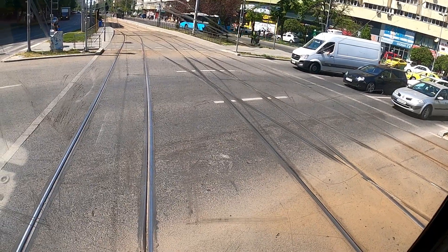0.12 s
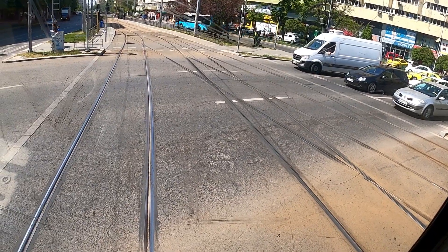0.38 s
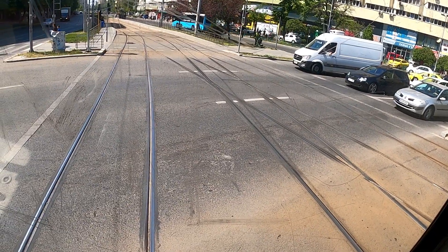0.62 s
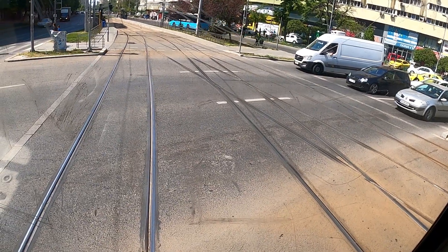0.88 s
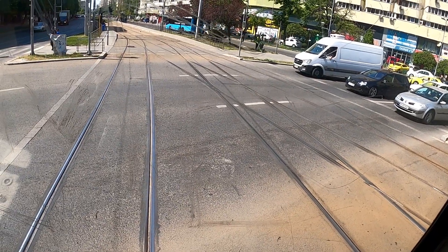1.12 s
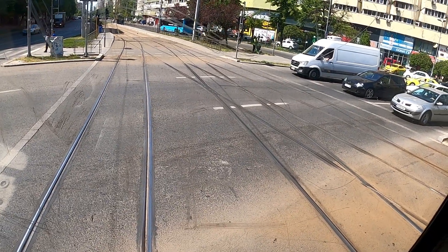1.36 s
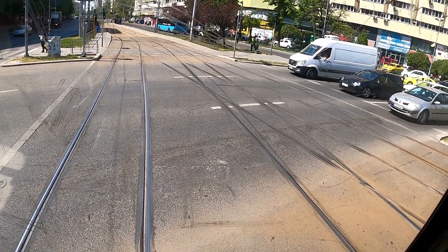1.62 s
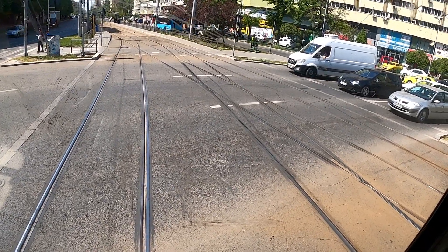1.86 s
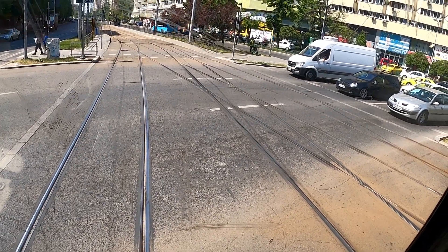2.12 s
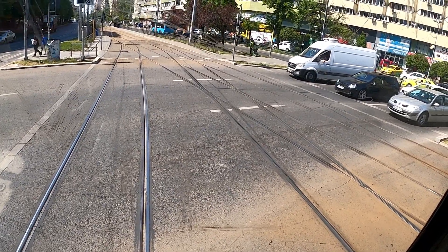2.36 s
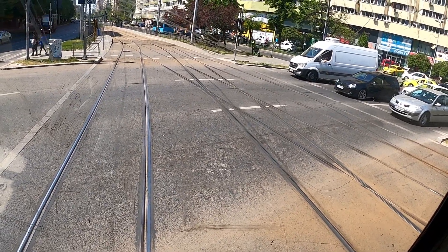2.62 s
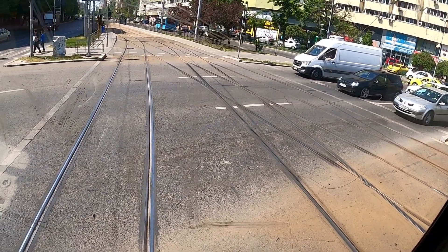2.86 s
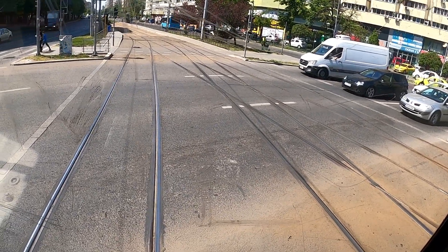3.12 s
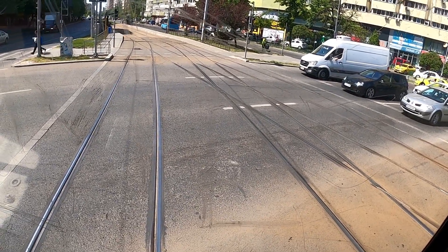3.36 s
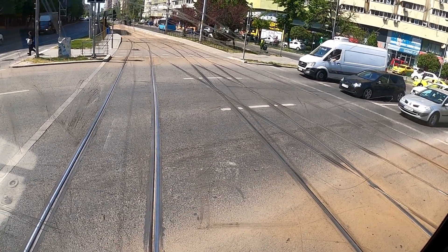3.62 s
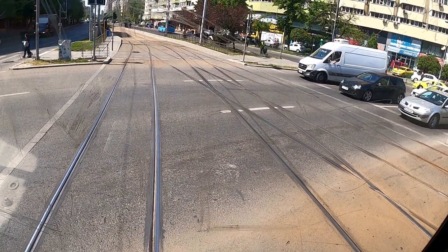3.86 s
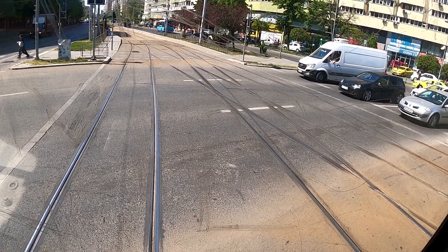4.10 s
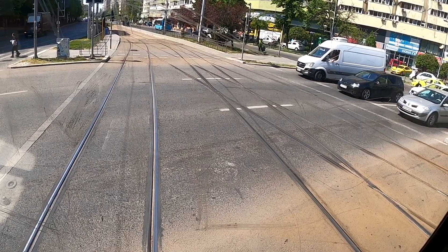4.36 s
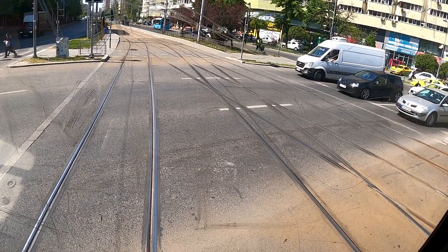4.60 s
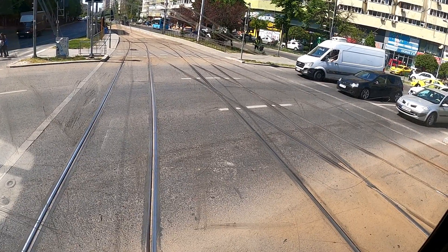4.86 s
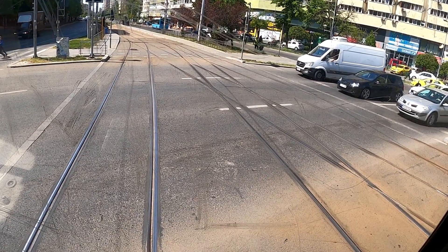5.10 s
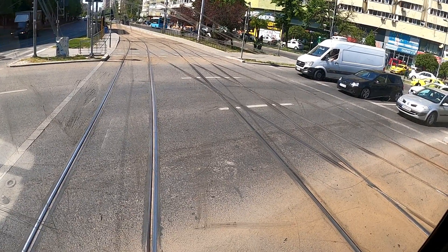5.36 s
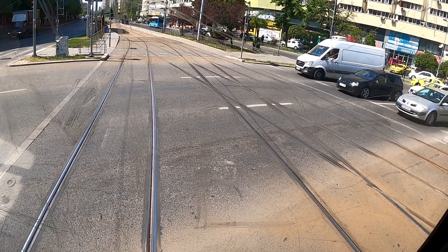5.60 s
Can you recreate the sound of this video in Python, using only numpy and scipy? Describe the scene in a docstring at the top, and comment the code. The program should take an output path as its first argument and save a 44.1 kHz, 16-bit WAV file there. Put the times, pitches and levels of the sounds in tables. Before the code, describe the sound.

Heard from a small stereo camera inside a stationary vehicle cab: deep throbbing idle and body rumble throughout, with dull street noise outside. An indicator relay tocks and ticks evenly in front, with short cabin echoes. Soft grainy hiss swells now and then, tiny dry rattles cluster around three seconds, and brief squeaks ride on hiss near the end. Two engines pull away quietly, one at the start, one from two seconds.

```python
"""Inside the cab of a tram that waits at a city crossing, heard through a small stereo camera.
From the start an idling engine, low drones and a first car pulling away sound over rumble and roar (noise).
The indicator relay (struck modes and noise) tocks open at 0.1 s, ticks shut at 0.6 s and so on, twice a second;
hiss (noise) swells now and then. A second car pulls away from 2 s; loose trim (dying sines) rattles lightly,
most densely near 3 s. Faint squeaks (narrow noise) come on swells of hiss from 4.5 s."""
import sys
import numpy as np
from scipy import signal
from scipy.fft import rfft, irfft, next_fast_len
from scipy.io import wavfile
from scipy.ndimage import uniform_filter1d, minimum_filter1d, map_coordinates

SR = 44100
rng = np.random.default_rng(int(sys.argv[2]) if len(sys.argv) > 2 else 0)


def boost_factor(decibels):
    """Convert a level in decibels to a linear amplitude factor."""
    exponent = np.asarray(decibels, float) / 20
    return 10 ** exponent


def digitize_waveform(pressure):
    """Quantize a signal to 16-bit integers and store it at the path in sys.argv[1].

    Rows of a 2-D input are taken as channels; values are limited to [-1, 1].
    """
    field = np.atleast_2d(pressure).T
    bounded = np.clip(field, -1, 1)
    quanta = np.round(bounded * 32767).astype(np.int16)
    wavfile.write(sys.argv[1], SR, quanta)


N = 252693


def unit(x):
    """Scale to rms 1."""
    return x / np.sqrt(np.mean(x ** 2) + 1e-20)


def along(points, hz):
    """Read (f/Hz, value) points on a log frequency axis."""
    f, v = np.transpose(points)
    return np.interp(np.log(hz + 1), np.log(f + 1), v)


def curves(rows):
    """One value per sample for each column after the time."""
    s, *cols = np.transpose(rows)
    return [np.interp(np.arange(N) / SR, s, c) for c in cols]


def wobble(knots_per_s):
    """A smooth random curve: spline through random knots, then straight pieces."""
    step = int(SR / knots_per_s / 8) + 1
    at = np.arange(0, N + step, step)
    knots = rng.standard_normal(int(N * knots_per_s / SR) + 4)
    spline = map_coordinates(knots, [at * knots_per_s / SR], mode="nearest")
    return np.interp(np.arange(N), at, spline)


def filtered(x, response):
    """x times a complex response of frequency."""
    m = next_fast_len(x.shape[-1] + 8192)
    return irfft(rfft(x, m) * response(np.fft.rfftfreq(m, 1 / SR)), m)[..., :x.shape[-1]]


def rush(spectrum, patchy_db):
    """Diffuse stereo noise of rms 1 with patches of random gain; its channels differ more towards the treble."""
    # likeness of the two microphone ports: (f/Hz, correlation)
    alike = [(25, .996), (60, .9985), (130, .9998), (240, .98), (480, .91), (970, .87), (1940, .9),
             (3880, .4), (7780, .2), (12000, .3)]
    z = signal.stft(rng.standard_normal((2, N)), nperseg=512)[2]
    field = uniform_filter1d(rng.standard_normal(z.shape[1:]), size=5, axis=0)
    field = uniform_filter1d(field, size=12, axis=1)
    pair = signal.istft(z * boost_factor(patchy_db * unit(field)), nperseg=512)[1][:, :N]

    def response(hz):
        turn = np.arccos(np.clip(along(alike, hz), 0, 1)) / 2
        return boost_factor(along(spectrum, hz)) * [np.cos(turn), np.sin(turn)]

    mid, side = filtered(pair, response)
    return unit(np.array([mid + side, mid - side]))


def unsteady(hz, level_db, order, drift, waver_db):
    """A sine on a multiple of an unsteady rate, its level wavering."""
    phase = 2 * np.pi * (order * np.cumsum(hz * (1 + drift)) / SR + rng.random())
    return np.sqrt(2) * boost_factor(level_db + waver_db * wobble(8.3)) * np.sin(phase)


def arch(row):
    """Pitch glides evenly over the span; the level is full in the middle and sinks ever faster to both sides."""
    start, end, from_hz, to_hz, db = row
    end_loss_db = 15.5
    u = (np.arange(N) / SR - start) / (end - start)
    hz = from_hz + (to_hz - from_hz) * np.clip(u, 0, 1)
    return hz, np.maximum(db - end_loss_db * (2 * u - 1) ** 4, -200)


def ring(hz, t60, attack=0.00022):
    """Dying sines, one row per mode; t60 and attack in s."""
    t = np.arange(SR // 4) / SR
    decay = boost_factor(-60 * t / np.reshape(t60, (-1, 1)))
    rise = 1 - np.exp(-t / np.reshape(attack, (-1, 1)))
    return np.sin(2 * np.pi * np.outer(hz, t)) * decay * rise


def strikes(rows, sound):
    """The same sound at every (t/s, level/dB)."""
    out = np.zeros(N + len(sound))
    for s, db in rows:
        out[round(s * SR):][:len(sound)] += boost_factor(db) * sound
    return out[:N]


def traffic():
    """Engine orders and drones over the rumble of the car body, and the roar of street and fans."""
    # an idling engine: (t/s, firing f/Hz, level/dB of orders 1, 3, 6)
    idler = [(0, 44.53, -30, -50.5, -63), (0.6, 45.43, -27.5, -38, -77), (1.2, 45.14, -31, -42.5, -66),
             (2.2, 44.64, -31.5, -49.5, -65), (2.75, 45.47, -26, -36, -61), (3.1, 46.03, -24.5, -51.5, -62),
             (3.3, 46.3, -29.5, -33, -67), (3.9, 46.45, -30, -40, -53.5), (4.7, 46.43, -25, -34.5, -60.5),
             (5.1, 47.03, -25.5, -35, -65.5), (5.73, 47.7, -29, -35.5, -59.5)]
    # vehicles pulling away: (start t/s, end t/s, firing f/Hz from, to, level/dB)
    cars = [(-.3, 1.05, 46.66, 50.5, -29), (2.004, 4.706, 52.64, 59.5, -37)]
    # their orders 2, 3, 4: (relative level/dB each)
    car_orders_db = [(0, -5.5, -17), (0, -3.5, -22)]
    # low drones that swell and fade: (start t/s, end t/s, f/Hz from, to, level/dB)
    drones = [(-0.2, 0.502, 27, 35.6, -28.5), (0.335, 1.136, 33, 30.2, -27), (3, 3.35, 42.7, 36, -31.5),
              (2.5, 3.464, 20.2, 37.3, -34), (4.008, 6.097, 32.8, 29.5, -25), (0.252, 0.897, 64, 73, -33.5),
              (1.264, 1.98, 52.3, 64, -28), (1.739, 2.5, 71, 73, -28), (2.0, 2.36, 64.6, 62.4, -29),
              (1.456, 2.291, 94, 100.5, -32), (2.496, 2.95, 54, 58.3, -30.5), (2.487, 3.43, 79, 82.4, -35),
              (3.0, 4.13, 74, 73.5, -35.5), (3.506, 4.15, 49, 48.6, -33.5), (4.497, 4.65, 73, 70, -32.5),
              (4.495, 4.75, 52, 50, -38.5), (4.504, 5.495, 91, 88.4, -33.5),
              (5.001, 5.407, 67.4, 71, -31.5), (5.485, 6.002, 69, 64, -27.5),
              (0.99, 1.707, 166, 144.4, -38.5), (1.2, 2.7, 30, 30.8, -32), (3.4, 4.201, 31.8, 30.7, -33.5),
              (5.495, 5.998, 126, 172, -44)]
    # noise levels along time: (t/s, body rumble relative level/dB, street roar relative level/dB)
    street = [(0.1, -19, -45), (0.45, -20, -47), (0.93, -24, -45), (2.38, -18.5, -44), (2.5, -24, -43.5),
              (3.64, -24.5, -44.5), (4.6, -19.5, -44), (5.6, -21, -46)]
    # rumble spectrum: (f/Hz, relative density/dB per Hz)
    rumble_spectrum = [(8.8, -39), (15, -3.5), (43, -3.5), (63, 3.5), (113, -9.5), (160, -9), (200, -17),
                       (251, -29), (320, -30.5), (420, -59), (700, -120)]
    # roar spectrum: (f/Hz, relative density/dB per Hz)
    roar_spectrum = [(120, -17.5), (200, 0), (255, -12), (285, -9), (369, -11.5), (433, -8), (560, -13.5),
                     (700, -17.5), (780, -15), (850, -18), (990, -13), (1400, -15.5), (1620, -23),
                     (1750, -28), (2600, -40.5), (5000, -80)]

    drift = .006 * wobble(6)
    idle_hz, *idle_db = curves(idler)
    tones = sum(unsteady(idle_hz, db, k, drift, 3.6) for k, db in zip((1, 3, 6), idle_db))
    for row, orders_db in zip(cars, car_orders_db):
        hz, db = arch(row)
        drift = .012 * wobble(7)  # shared by the orders of one engine
        tones += sum(unsteady(hz, db + rel, k, drift, 3) for k, rel in zip((2, 3, 4), orders_db))
    tones += sum(unsteady(*arch(row), 1, .035 * wobble(8), 4) for row in drones)

    rumble_db, roar_db = curves(street)
    rumble = boost_factor(rumble_db - 7.0 + 1.5 * wobble(5)) * rush(rumble_spectrum, patchy_db=0.53)
    roar = boost_factor(roar_db + 1.5 + .4 * wobble(5)) * rush(roar_spectrum, patchy_db=1.1)
    return tones + rumble + roar


def relay():
    """The armature snaps shut and drops open, alike each time: chattering contacts ring the panel; the clack is broad."""
    # contacts closing: (t/s, relative level/dB)
    closings = [(.603, -39), (1.6396, -36.5), (2.6765, -37.5), (3.7133, -36.5), (4.7535, -36)]
    # contacts opening: (t/s, relative level/dB)
    openings = [(.1, -39), (1.1366, -39.5), (2.1735, -38), (3.2103, -38.5), (4.2471, -38), (5.2897, -40.5)]
    # relay and panel modes, mostly shorter towards the treble:
    # (f/Hz, t60/s, relative level/dB on closing, on opening)
    relay_modes = [(432, 0.12, -8, -13.5), (658, 0.13, -3.5, -14), (795, 0.2, -4, -17.5),
                   (915, 0.16, -2, -11), (1105, 0.1, -0.5, -8.5), (1794, 0.057, -1.5, -20),
                   (2000, 0.04, -28, -8.5), (2140, 0.045, -20.5, -6.5), (2428.5, 0.097, -13.5, -9.5),
                   (2980, 0.008, -10.5, -9), (3350, 0.038, -14.5, -22), (3780, 0.0072, -12, -7.5),
                   (4570, 0.02, -19, -17.5), (4850, 0.022, -13.5, -17), (5400, .012, -20, -15.5),
                   (6970, 0.0065, -4.5, -14), (9960, 0.011, -41, -26.5)]
    # clack spectrum on closing: (f/Hz, relative density/dB per Hz)
    clack_shut = [(400, -29), (800, 8), (1500, 3), (3000, -2.5), (5000, -4.5), (6000, -15), (7400, -10.5),
                  (8300, -33), (13000, -36)]
    # clack spectrum on opening: (f/Hz, relative density/dB per Hz)
    clack_open = [(400, -35), (900, 1), (1500, 2.5), (3000, -1.5), (4500, -6), (6000, -18.5), (7400, -17),
                  (8300, -21.5), (13000, -36.5)]

    hz, t60_s, close_db, open_db = np.transpose(relay_modes)
    attack_s = np.where(hz < 1300, 0.0078, .00022)  # low panel modes build up slowly
    modes = ring(hz, t60_s, attack_s)
    t = np.arange(SR // 10) / SR
    panel = clacks = 0
    for rows, mode_db, spectrum in [(closings, close_db, clack_shut), (openings, open_db, clack_open)]:
        chatter = rng.standard_normal(len(t)) * boost_factor(-60 * t / 0.026) * (1 - np.exp(-t / 0.0029))
        drive = np.abs(np.exp(-2j * np.pi * np.outer(hz, t)) @ chatter)  # what the chatter holds at each mode
        panel = panel + strikes(rows, signal.fftconvolve(chatter, boost_factor(mode_db) / drive @ modes))
        clack = unit(filtered(rng.standard_normal(len(t)), lambda f: boost_factor(along(spectrum, f))))
        envelope = boost_factor(-60 * t / 0.079) * (1 - np.exp(-t / 0.0023))
        clacks = clacks + strikes(rows, boost_factor(-6.5) * clack * envelope)
    return panel, clacks


def rattles():
    """Short dry ticks of loose trim, each a few dying sines: the clear ones, then many faint ones at random."""
    # light rattles: (t/s, relative level/dB, f/Hz)
    clear_ticks = [(.865, -47, 2500), (1.266, -56, 4800), (1.334, -55, 2600), (2.889, -46, 2900),
                   (2.901, -50, 4100), (2.948, -50, 4300), (2.986, -49, 4200), (3.002, -51, 2900),
                   (3.047, -48, 2700), (3.082, -52, 3600), (3.488, -57, 3000), (3.949, -56, 3000),
                   (5.009, -53, 3500)]
    # a thin bright tick that bounces once: (t/s, relative level/dB, f/Hz)
    bright_ticks = [(1.2655, -66, 10000), (1.2685, -64, 10400)]

    def tick(hz):
        return boost_factor([0, -4, -5]) @ ring([hz, 1.45 * hz, .78 * hz], [.01, .007, .008], attack=.0003)

    ticks = sum(strikes([(s, db)], tick(hz)) for s, db, hz in clear_ticks)
    for s, db, hz in bright_ticks:
        partials = ring([hz, 1.1 * hz, 1.22 * hz, 1.33 * hz], [.01, .006, .005, .005], attack=.0005)
        ticks += strikes([(s, db)], partials.sum(0))
    for when, size, pitch in rng.random((30, 3)):
        ticks += strikes([(when * (N - 1) / SR, -68 + 9 * size)], tick(2200 * 2.5 ** pitch))
    return ticks


def hiss():
    """A slightly grainy hiss that rises, holds and falls, over a faint patchy floor; its top opens with the brightness."""
    # swells: (full at t/s, hold t/s, relative level/dB, rise/(dB/s), fall/(dB/s), brightness/dB)
    swells = [(0, 0.032, -58, 130, 65, 6.5), (0.612, 0.15, -58.5, 898, 59, 1.5),
              (0.878, 0.073, -51.5, 160, 56.5, 0.5), (0.994, 0.05, -58, 100, 121, 4),
              (1.102, 0.12, -64, 128, 24, 5.5), (1.567, 0.1, -58, 131, 33, -1),
              (2.914, 0.18, -65, 133, 37.5, 2.5), (3.133, 0.026, -59.5, 131, 65, -1),
              (3.207, 0.013, -53, 130, 108.5, 1), (4.536, 0.08, -58, 105, 57, -11),
              (4.718, 0.023, -50, 133, 78, -0.5), (4.832, 0.11, -58, 135, 201, -7),
              (5.007, 0.068, -57.5, 500, 58, -1.5), (5.689, 0.11, -70.5, 131, 47, 7)]
    # the hiss between swells: (t/s, relative level/dB, brightness/dB)
    calm = [(0, -68, -2.5), (3.4, -70.5, 4), (3.7, -65, -0.5), (4.45, -67, 2.5), (5.5, -72.5, -7.5)]
    # hiss spectrum: (f/Hz, relative density/dB per Hz)
    air_spectrum = [(710, -37), (1200, -5.5), (1700, -6), (2400, -9.5), (3060, -9), (4150, -15.5),
                    (5500, -17.5), (7400, -23), (8300, -34), (10500, -40), (13000, -50), (15500, -66.5)]
    # floor spectrum: (f/Hz, relative density/dB per Hz)
    floor_spectrum = [(1500, -21.5), (2500, 0), (5000, -8.5), (7500, -13), (8500, -38.5), (15500, -51),
                      (16000, -120)]

    s, hold, db, rise, fall, bright_db = np.transpose(swells)[..., None]
    late = np.arange(N) / SR - s
    power = boost_factor(db - rise * np.maximum(-late, 0) - fall * np.maximum(late - hold, 0)) ** 2
    calm_db, calm_bright_db = curves(calm)
    calm_power = boost_factor(calm_db) ** 2
    total = power.sum(0) + calm_power
    bright = ((power * bright_db).sum(0) + calm_power * calm_bright_db) / total  # dB, weighted by power
    grain = boost_factor(.8 * wobble(60) + .7 * wobble(400))
    air = rush(air_spectrum, patchy_db=1.0) * grain
    top = filtered(air, lambda hz: 1 / (1 + (4200 / (hz + 1)) ** 4))
    swelling = boost_factor(3.5) * np.sqrt(total) * (air + (boost_factor(bright) - 1) * top)
    return swelling + boost_factor(-73.0) * rush(floor_spectrum, patchy_db=5.0)


def blurred_tones():
    """Narrow noise on a wavering pitch: a tone times slow noise as wide as the line."""
    # faint tones in the roar (fans, a passing whine): (start t/s, end t/s, f/Hz from, to, level/dB, width/Hz)
    blurred = [(-0.26, 1.9, 1438, 1440, -56, 400), (.12, .8, 1020, 960, -54.5, 120),
               (1.28, 1.6, 970, 1000, -53.5, 60), (1.62, 2.1, 990, 985, -56, 100),
               (1.15, 1.45, 1110, 1120, -57, 60), (.94, 1.02, 1570, 1590, -54, 45),
               (-.1, .5, 1270, 1250, -57, 80), (3, 3.7, 1333, 1400, -60.5, 70),
               (3.5, 4.7, 1500, 1300, -62, 60), (1.8, 2.12, 1590, 1625, -59, 30),
               (2.5, 3.8, 800, 785, -60, 45), (4, 5.1, 790, 770, -57, 90), (5, 6, 780, 700, -60, 40),
               (4.1, 5.3, 430, 420, -58.5, 25)]
    # faint squeaks on the late swells: (start t/s, end t/s, f/Hz from, to, level/dB, width/Hz)
    squeaks = [(4.49, 4.62, 2420, 2200, -62.5, 200), (4.54, 4.67, 2170, 2000, -60, 130),
               (4.68, 4.97, 3180, 3070, -59.5, 350), (5.02, 5.12, 3300, 3500, -66, 600),
               (4.79, 4.83, 6200, 6180, -72, 100)]
    tones = 0
    for *row, width_hz in blurred + squeaks:
        tone = unsteady(*arch(row), 1, .006 * wobble(6), 1.5)
        tones = tones + unit(wobble(width_hz)) * tone
    return tones


def cab(x):
    """Reverberation: stereo noise in which each frequency dies at its own speed, convolved with x."""
    # decay of the cab: (f/Hz, t60/s)
    cab_t60 = [(500, 0.9), (2000, 0.24), (5000, 0.31), (9000, 0.063)]
    hz, t, z = signal.stft(rng.standard_normal((2, SR // 2)), SR, nperseg=256)
    tail = signal.istft(z * boost_factor(-60 * t / along(cab_t60, hz)[:, None]), SR, nperseg=256)[1]
    delayed = np.pad(x, (200, 0))[None]  # samples
    return signal.fftconvolve(delayed, tail / np.linalg.norm(tail[0]), axes=1)[:, :N]


def scene():
    """Near clicks in the cab over the outside sound; the panel reaches the camera mostly through its mount."""
    panel, clacks = relay()
    trim = rattles()
    echoes = cab(boost_factor(-9) * panel + boost_factor(3) * clacks + boost_factor(-6) * trim)
    near = boost_factor(-1) * panel + boost_factor(-6.5) * clacks + trim
    return near + echoes + traffic() + blurred_tones() + hiss()


def band_limit(x):
    """A steep low-pass at the top of the band."""
    return signal.sosfilt(signal.butter(12, 15700, fs=SR, output="sos"), x)


def record(dry):
    """The two ports differ in level and phase, a gentle limiter holds the peaks, the sound opens softly."""
    # level between the microphone ports: (f/Hz, left minus right/dB)
    balance_db = [(150, 0), (300, .6), (600, 1.6), (1100, 3.4), (2600, 3.8), (4500, 1), (6500, -2),
                  (9000, -2.5), (12000, 1)]
    # phase between the microphone ports: (f/Hz, left lead/rad)
    lead_rad = [(170, 0), (690, -.2), (1980, -.9), (3010, -.9), (4900, -.2), (7900, 0)]
    edge, window, ceiling = 4096, 2001, .28  # samples, samples, peak amplitude

    def port(hz):
        return boost_factor(along(balance_db, hz) / 2) * np.exp(.5j * along(lead_rad, hz))

    longer = np.pad(dry, ((0, 0), (edge, edge)), "reflect", reflect_type="odd")
    ports = filtered(longer, lambda hz: np.array([port(hz), 1 / port(hz)]))[:, edge:-edge]
    need = np.minimum(ceiling / (np.abs(ports).max(0) + 1e-9), 1)
    limited = ports * uniform_filter1d(minimum_filter1d(need, size=window), size=window)
    mix = limited * np.minimum(np.arange(N) / (.004 * SR), 1)  # 4 ms fade-in
    return band_limit(mix)


dry = scene()
out = record(dry)
digitize_waveform(out)
```